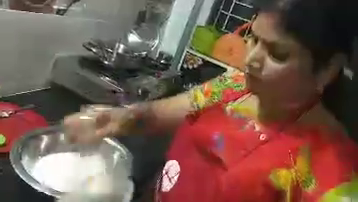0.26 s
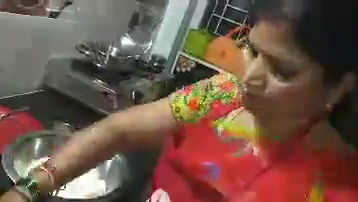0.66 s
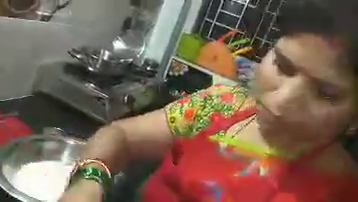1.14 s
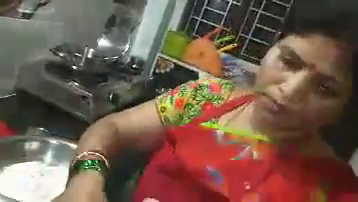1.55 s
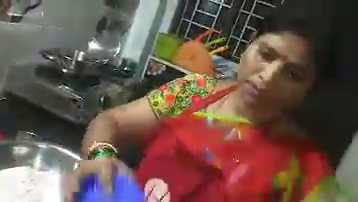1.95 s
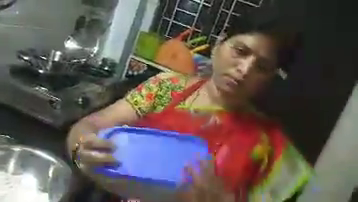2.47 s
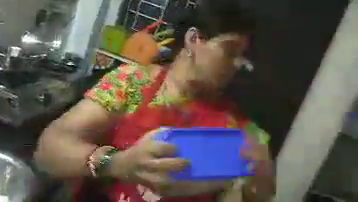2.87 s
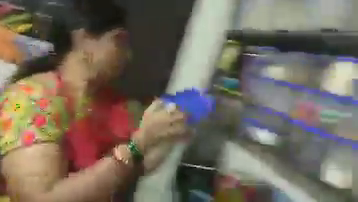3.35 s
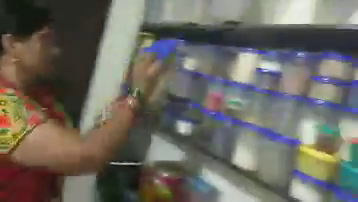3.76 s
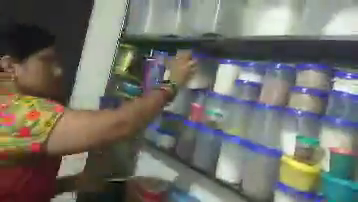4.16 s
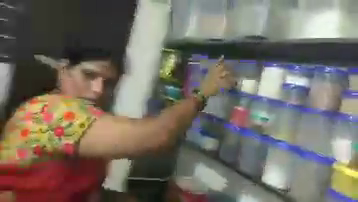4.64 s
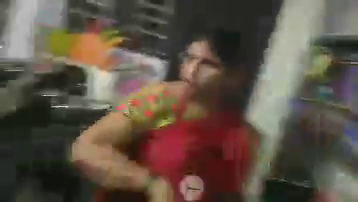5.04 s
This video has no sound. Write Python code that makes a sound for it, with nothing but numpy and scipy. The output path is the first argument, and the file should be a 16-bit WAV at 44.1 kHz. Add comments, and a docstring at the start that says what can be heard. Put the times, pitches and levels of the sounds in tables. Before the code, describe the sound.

Two loud snaps close a plastic jar in a small kitchen, followed by hollow bumps on a shelf, with bangles clinking throughout.

```python
"""A small tiled kitchen, one microphone near the counter, faint room noise underneath.
A cook puts a spoon aside and picks up a plastic storage jar: light, hollow knocks. The lid goes on with
two loud snaps, each end jumping the rim and ringing the jar; then the jar bumps in among others on a shelf.
Glass bangles clash and ring on the moving wrist, with more room on them as it draws away from the
microphone. Hands, cloth and plastic rustle in short strokes of friction."""
import sys
import numpy as np
from scipy import signal
from scipy.io import wavfile

SR = 44100
rng = np.random.default_rng(int(sys.argv[2]) if len(sys.argv) > 2 else 0)


def transcribe(signal):
    """Save signal, clipped to [-1, 1], as a 16-bit WAV file at the path in sys.argv[1]."""
    frames = np.atleast_2d(signal).T
    limited = np.clip(frames, -1, 1)
    pcm = np.round(limited * 32767).astype(np.int16)
    wavfile.write(sys.argv[1], SR, pcm)


N = 234095
T = np.arange(SR // 2) / SR  # seconds after a blow
HZ = np.fft.rfftfreq(4096, 1 / SR) + 1  # frequency grid of the filters

# Reverberation of the kitchen. Each row: frequency in Hz, t60 in seconds.
ROOM_DECAY = [(100, 0.5), (300, 0.54), (1000, 0.47), (3000, 0.55), (6000, 0.48), (10000, 0.44),
              (15000, 0.19)]
# Level of the room tone. Each row: time in seconds, level in dB.
ROOM_TONE_LEVEL = [(0, -63.5), (.4, -58.5), (1, -57), (5.3, -57.3)]

# Tone colours. Each row: frequency in Hz, relative spectral density in dB.
ROOM_TONE_COLOUR = [(15, -76), (25, -34), (64, -9.5), (156, -11.5), (198, -1), (233, -10), (340, -4.5),
                    (389, -5), (567, -7), (666, -11.5), (762, -9), (1570, -11), (2420, -10), (4750, -21.5),
                    (15500, -36)]
KNOCK_COLOUR = [(25, -36), (60, -25), (120, -18.5), (220, -2.5), (400, -3.5), (800, -8), (1500, -2.5),
                (2800, -1), (4300, -8.5), (7500, -8.5), (11000, -15.5), (15000, 0)]
CLASH_COLOUR = [(300, -27.5), (2000, -24), (4300, -14), (5500, -16), (7200, -10), (8200, -3), (9500, -10),
                (11800, -15.5), (13300, 0), (15400, -1.5)]
RUB_COLOUR = [(25, -35), (90, -4.5), (300, -0.5), (800, -7.5), (3000, -1), (4500, -8), (7500, -1.5),
              (11000, -11.5), (15000, -6.5)]
LID_END_COLOURS = [
    [(30, -48), (72, -35), (108, -12), (150, -14), (260, -2.5), (380, -6.5), (780, -12), (950, -7.5),
     (1700, -9), (2400, -6.5), (4300, -10), (5600, -8.5), (10500, -31), (15000, -30)],
    [(35, -49), (78, -39), (110, -18.5), (175, -15.5), (330, 0.5), (430, -1), (560, -15.5), (780, -11),
     (1000, -18.5), (1400, -16), (2200, -9), (5000, -12), (8300, -19), (10000, -25.5), (15000, -22)],
]  # one list for each end of the lid
BUMP_COLOUR = [(30, -43), (72, -37), (112, -6.5), (150, -5.5), (200, 3.5), (330, 1), (480, -0.5),
               (680, -13), (920, -5.5), (1300, -10.5), (3000, -10.5), (5000, -19), (8000, -25.5),
               (14000, -32)]

# Ringing bodies. Each row: frequency in Hz, relative level in dB, t60 in seconds.
STACK_MODES = [(4240, -16, 0.28), (4720, -20, 0.23), (7800, -17, 0.17), (8000, 6, 0.2), (8160, -1, 0.2),
               (9440, -7, 0.17), (10800, -7, 0.17), (13500, 1, 0.088), (13750, -13, 0.15), (14200, 1, .2),
               (15100, 14, .2)]  # bangles in contact
BANGLE_MODES = {"first": [(4790, -13, 0.24), (5700, -9, .22), (6380, -4.5, 0.24), (8000, 3.5, 0.25),
                (9000, -6, 0.3), (10340, -9, .2), (12600, 0, 0.17), (13100, 7, 0.13), (13750, 2, .15),
                (14700, -5, .15)], "second": [(4780, -10, 0.33), (5800, -4, .3), (6530, -8.5, 0.35),
                (8010, -5.5, 0.91), (9000, -1, 0.28), (12900, 12, 0.15), (13700, -8, .2), (14800, 3, 0.15)],
                "third": [(4630, -12.5, 0.3), (7700, -18, 0.19), (8000, -4, 0.37), (9000, 0, 0.44),
                (9900, -9, .25), (10860, -11, 0.26), (13000, 2, 0.24), (14300, -4, .15), (14800, 1, 0.14)],
                "fourth": [(4550, -15, 0.31), (6660, -7, 0.22), (7600, -13, .22), (8380, 0, 0.48),
                (8600, 3, 0.28), (10960, -4.5, 0.4), (12830, 0, .2), (14100, 8, 0.23), (15600, 4, 0.24)]}  # four glass bangles, one list for each name
JAR_MODES = [(249, 3, 0.13), (272, 4, 0.19), (318, -3, 0.45), (371, 4, 0.22), (455, -6.5, 0.41),
             (823, -7.5, 0.17), (1430, -19, 0.1), (2050, 4.5, 0.28), (1990, -16, 0.2), (2370, -8, 0.122),
             (2330, 9, 0.1), (2740, -25, 0.22), (3000, -21, .3), (3450, -15, 0.72), (4340, -5, 0.27),
             (4970, -6, 0.3)]  # the closed jar
SHELF_MODES = [(108, -7.5, 0.4), (202, -7.5, 0.33), (283, 2, .22), (344, 9, 0.31), (485, -2.5, 0.196),
               (924, -5, 0.22), (1164, -5, 0.29), (1426, -13.5, 0.22)]  # the loaded shelf

# Spoon, jar and fingers at the counter.
# Each row: start in seconds, level in dB, hollow note in Hz, treble cutoff in Hz.
KNOCKS = [(0.1951, -44.5, 6400, 12000), (0.223, -43.5, 970, 6030), (1.106, -30.5, 550, 6200),
          (1.233, -40, 335, 1000), (1.9766, -44, 328, 9000), (2.57, -45.5, 303, 4760)]
# Ticks close to the microphone. Each row: start in seconds, level in dB, centre in Hz, width in octaves.
CLOSE_TICKS = [(.3222, -54, 3080, 1.23), (1.8054, -43, 242, 1.66), (1.9766, -44.5, 7000, 0.2)]
# Arm movements that jostle the bangles. Each row: start and end in seconds.
ARM_MOVES = [(0.382, 0.58), (.8, 0.87), (1.299, 1.42), (1.719, 2.24)]
# Clear clinks. Each row: start in seconds, clash level in dB, bangle that swings free, its ring in dB.
CLINKS = [(0.508, -47, "third", -44), (0.5343, -39.5, "third", -50), (0.642, -35, "fourth", -38.5),
          (0.6477, -33.5, "third", -42), (.739, -50, "first", -63), (.796, -43.5, "third", -50),
          (.922, -54, "second", -63), (1.048, -45, "first", -43.5), (1.076, -61, "first", -49),
          (1.429, -50, "second", -44.5), (1.771, -55, "second", -64), (1.943, -49, "fourth", -59),
          (2.065, -57, "second", -58), (2.104, -42, "fourth", -49), (2.1125, -41.5, "fourth", -43.5),
          (2.201, -49, "second", -68), (2.272, -57, "third", -55.5), (2.351, -51, "fourth", -55),
          (3.671, -36.5, "third", -37), (3.677, -25.5, "fourth", -44), (3.819, -46, "first", -63),
          (3.871, -56, "third", -54.5), (3.934, -54, "fourth", -52.5), (4.959, -56, "third", -63),
          (5.007, -47.5, "third", -48.5), (5.111, -52, "second", -48), (5.2, -46, "fourth", -49),
          (5.212, -48.5, "fourth", -49)]
# The wrist moves off the microphone. Each row: time in seconds, room against direct sound in dB.
WRIST_ROOM = [(0.6, -2.5), (2.3, 2), (3.7, 7.5), (5.2, 8)]
# Friction strokes. Each row: middle in seconds, quarter length in seconds, level in dB, treble cutoff in Hz.
RUBS = [(0.714, 0.017, -54, 3000), (1.223, 0.007, -41.5, 1950), (1.235, 0.016, -49, 5700),
        (1.847, 0.053, -52.5, 8000), (1.975, 0.033, -45.5, 11500), (2.215, 0.15, -61, 9000),
        (3.388, 0.085, -55.5, 7000), (3.603, .1, -57, 13000), (4.135, .04, -51, 3930),
        (4.257, 0.05, -45.5, 3670), (4.333, .13, -55.5, 10600), (4.366, 0.035, -45.5, 1510)]
# The lid's two snaps. Each row: start in seconds, level in dB, rattle decay in seconds, rattle and room
# in dB against the click, jar ring in dB, drum note in Hz, drum level in dB.
SNAPS = [(2.656, -15, 0.0086, 9, 5.5, -25.5, 272, -23), (3.0749, -13.5, 0.017, 9, 9.5, -24, 318, -34.5)]
# The jar against the shelf and its neighbours.
# Each row: start in seconds, strength in dB, hollow note in Hz, treble cutoff in Hz.
BUMPS = [(4.09, -45.5, 217, 3500), (4.099, -42.5, 214, 3520), (4.198, -35, 303, 1600),
         (4.236, -35.5, 372, 2480), (4.254, -35, 513, 6000), (4.262, -32, 458, 6100),
         (4.287, -34.5, 505, 2500), (4.401, -25, 323, 5770), (4.45, -37.5, 336, 1970)]


def amp(db):
    """Decibels to gain."""
    return 10 ** (np.asarray(db) / 20)


def unit(x):
    """Scales to an energy of one."""
    return x / np.sqrt(np.sum(x ** 2) + 1e-20)


def curve(points, hz=HZ):
    """Joins (Hz, value) points on a log-frequency axis."""
    point_hz, value = np.transpose(points)
    return np.interp(np.log(hz + 1), np.log(point_hz), value)


def add(mix, s, db, sound):
    """Mixes a blow in at s seconds; db is its level if all its energy fell within 20 ms."""
    part = mix[max(round(s * SR), 0):][:len(sound)]
    part += (amp(db) * np.sqrt(SR / 50) * unit(sound))[:len(part)]


def colour(x, db):
    """Minimum-phase filter with the gain db on the grid HZ."""
    log_gain = np.log(amp(np.maximum(db, -100)))
    mirrored = np.concatenate([log_gain, log_gain[-2:0:-1]])
    taps = np.fft.ifft(np.exp(np.conj(signal.hilbert(mirrored)))).real
    return signal.oaconvolve(x, taps)[:len(x)]


def room_tone():
    """Soft room noise; the background level rises a little over the first second."""
    noise = colour(rng.standard_normal(N + len(HZ)), curve(ROOM_TONE_COLOUR))[-N:]
    level_db = np.interp(np.arange(N) / SR, *np.transpose(ROOM_TONE_LEVEL))
    return unit(noise) * np.sqrt(N) * amp(level_db)


def dull(above_hz):
    """A soft contact loses its treble: dB on the grid HZ."""
    return -10 * np.log10(1 + (HZ / above_hz) ** 4)


def hollow(note_hz, note_db, octaves):
    """The broad resonance of a hollow body: dB on the grid HZ."""
    return note_db / (1 + (np.log2(HZ / note_hz) / octaves) ** 2)


def room_tail(build_s=0.0043, early_s=0.049):
    """Dense reflections, strongest from the near walls; each band dies at its own speed."""
    hz, t, bands = signal.stft(rng.standard_normal(len(T)), SR, nperseg=256)
    decay = amp(-60 * t / curve(ROOM_DECAY, hz)[:, None])
    tail = signal.istft(bands * decay, SR, nperseg=256)[1][:len(T)]
    return unit(tail * (1 - np.exp(-T / build_s)) * (1 + np.exp(-T / early_s)))


def blow(colour_db, rattle_s, rattle_db, room_db):
    """A click, the crowded and quickly damped modes of thin plastic walls, and the room's answer."""
    click = T == 0
    walls = unit(rng.standard_normal(len(T)) * np.exp(-T / rattle_s))
    return colour(click + amp(rattle_db) * walls + amp(room_db) * room_tail(), colour_db)


def handling():
    """Light knocks at the counter, and ticks so close to the microphone that they carry no room."""
    out = np.zeros(N)
    for s, db, note_hz, dull_hz in KNOCKS:
        shape = curve(KNOCK_COLOUR) + hollow(note_hz, note_db=12.5, octaves=0.44) + dull(dull_hz)
        add(out, s, db, blow(shape, rattle_s=0.0083, rattle_db=6.5, room_db=5.5))
    for s, db, centre_hz, octaves in CLOSE_TICKS:
        band_db = np.maximum(-6 * (np.log2(HZ / centre_hz) / octaves) ** 2, -50)
        add(out, s, db, colour(1.0 * (T == 0), band_db))
    return out


def ring(modes, scatter_db, detune, flutter_hz, dry_s):
    """Dying partials that vary with the point of contact; after dry_s their own echoes make them flutter."""
    knots = np.arange(0, 1, 1 / flutter_hz)
    direct = np.exp(-T / dry_s)
    out = np.zeros(len(T))
    for hz, db, t60 in modes:
        weight, shift = rng.standard_normal(2)
        phasors = rng.standard_normal((256, 2)) @ [1, 1j] / np.sqrt(2)
        echoes = np.interp(T, knots, np.resize(phasors, len(knots)))
        swing = np.sign(shift) * direct + np.sqrt(1 - direct ** 2) * echoes
        partial = (swing * np.exp(2j * np.pi * hz * (1 + detune * shift) * T)).imag
        out += amp(db + scatter_db * weight - 60 * T / t60) * partial
    return unit(out)


def jostles(per_move=2, clash_db=-57.5, ring_db=-69):
    """The moving arm shakes faint clinks from the bangles at random: rows like those of CLINKS."""
    names = list(BANGLE_MODES)
    rows = []
    for start, end in ARM_MOVES:
        for k, (late, which) in enumerate(rng.random((per_move, 2))):
            s = start + (k + late) / per_move * (end - start)
            rows.append((s, clash_db, names[int(which * len(names))], ring_db))
    return rows


def bangles(contacts_per_s=2500, stack_db=-7, middling_db=-50, wrist_damping_s=0.066):
    """Bangles slide together in a flurry of tiny contacts; one swings free and rings on."""
    out = np.zeros(N)
    for s, clash_db, name, ring_db in CLINKS + jostles():
        swell_s = 0.0022 * 2 ** ((clash_db - middling_db) / 14)  # harder clashes gather more bangles
        room_gain = amp(np.interp(s, *np.transpose(WRIST_ROOM)))
        contacts = rng.standard_normal(len(T)) * (rng.random(len(T)) < contacts_per_s / SR)
        flurry = T / swell_s * np.exp(-T / swell_s)
        filling = np.sqrt(np.cumsum(unit(flurry) ** 2))  # room and glass take up energy as contacts come
        clash = unit(contacts * flurry) + room_gain * unit(room_tail() * filling)
        clash = unit(colour(clash, curve(CLASH_COLOUR)))
        stack = ring(STACK_MODES, scatter_db=7, detune=0.01, flutter_hz=120, dry_s=0.0046)
        add(out, s, clash_db, clash + amp(stack_db) * unit(stack * filling))
        free_bangle = ring(BANGLE_MODES[name], scatter_db=5, detune=0.002, flutter_hz=90, dry_s=0.024)
        damping = np.exp(-T / wrist_damping_s) + room_gain  # the note lingers in the room
        add(out, s, ring_db, free_bangle * damping)
    return out


def rubbing(grain_db=2.0):
    """Hands, cloth and plastic slip in strokes of fine, grainy friction."""
    out = np.zeros(N)
    for s, quarter_s, db, dull_hz in RUBS:
        n = int(np.ceil(4 * quarter_s * SR))
        slips = rng.standard_normal(n) * amp(grain_db * rng.exponential(1, n))
        friction = unit(colour(slips, curve(RUB_COLOUR) + dull(dull_hz))) * np.sqrt(n)
        start = round(s * SR) - n // 2
        out[start:start + n] += amp(db) * friction * np.hanning(n)
    return out


def thump(hz, decay_s):
    """The air in a jar swings a few times."""
    return np.sin(2 * np.pi * hz * T) * np.exp(-T / decay_s) * (1 - np.exp(-T * hz)) ** 2


def lid():
    """Each end of the lid jumps over the rim, drums on the trapped air and sets the jar ringing."""
    out = np.zeros(N)
    for snap, end_colour in zip(SNAPS, LID_END_COLOURS):
        s, db, rattle_s, rattle_db, room_db, ring_db, drum_hz, drum_db = snap
        add(out, s, db, blow(curve(end_colour), rattle_s, rattle_db, room_db))
        add(out, s, ring_db, ring(JAR_MODES, scatter_db=-1, detune=0.0022, flutter_hz=20, dry_s=0.11))
        add(out, s, drum_db, thump(drum_hz, decay_s=0.005))
    return out


def shelf(middling_db=-36.5, walls_db=-1.5, thump_db=-5.5, ring_db=-50):
    """The jar nudges its neighbours and lands; the harder the bump, the more it rattles and rings the shelf."""
    out = np.zeros(N)
    for s, db, note_hz, dull_hz in BUMPS:
        force_db = db - middling_db
        note_db = 6.5 - 0.08 * force_db  # softer bumps are more purely hollow
        shape = curve(BUMP_COLOUR) + hollow(note_hz, note_db, octaves=0.51) + dull(dull_hz)
        rattle_s = 0.0098 * 2 ** (force_db / 8)
        add(out, s, db + walls_db, blow(shape, rattle_s, rattle_db=6, room_db=5.5))
        add(out, s, db + thump_db, thump(note_hz, decay_s=0.0078))
        board = ring(SHELF_MODES, scatter_db=1.5, detune=0.005, flutter_hz=25, dry_s=0.1)
        add(out, s, ring_db + 1.7145 * force_db, board)
    return out


def scene():
    """The whole kitchen at one microphone."""
    return (lid() + handling() + shelf() + bangles() + rubbing() + room_tone())[None]


def record(dry, low_cut_hz=56, top_hz=15600):
    """The microphone's low cut, then a steep limit on the treble."""
    low_cut = signal.butter(2, low_cut_hz, "highpass", fs=SR, output="sos")
    band_limit = signal.firwin(255, top_hz, window=("kaiser", 8), fs=SR)
    return signal.oaconvolve(signal.sosfilt(low_cut, dry), band_limit[None], "same")


dry = scene()
out = record(dry)
transcribe(out)
```